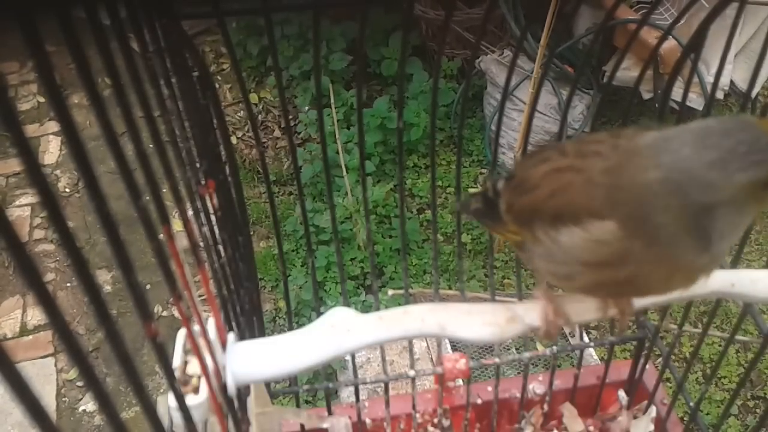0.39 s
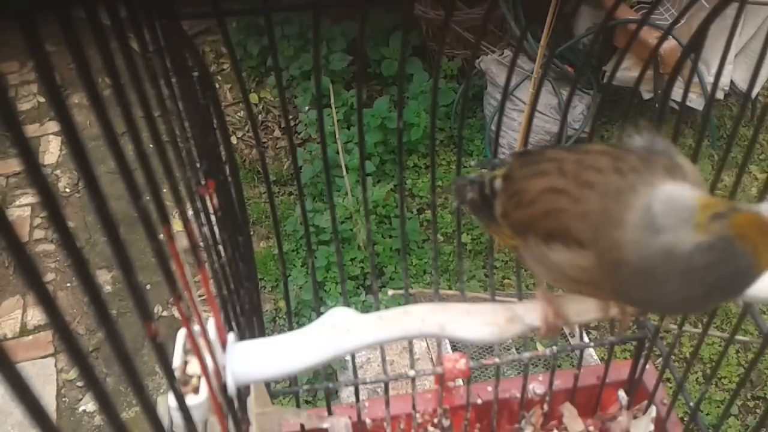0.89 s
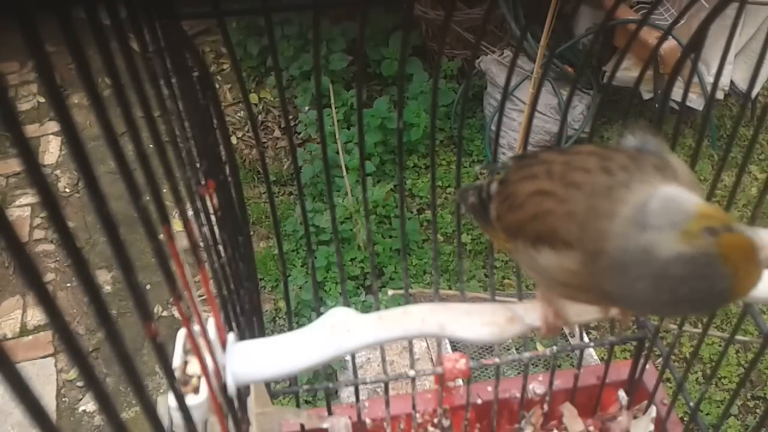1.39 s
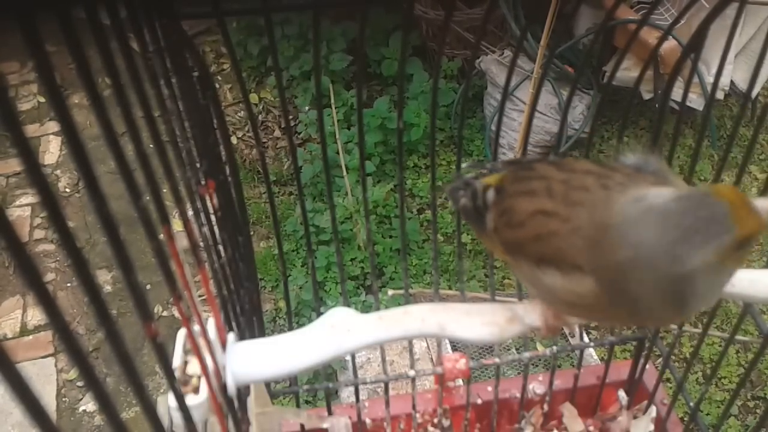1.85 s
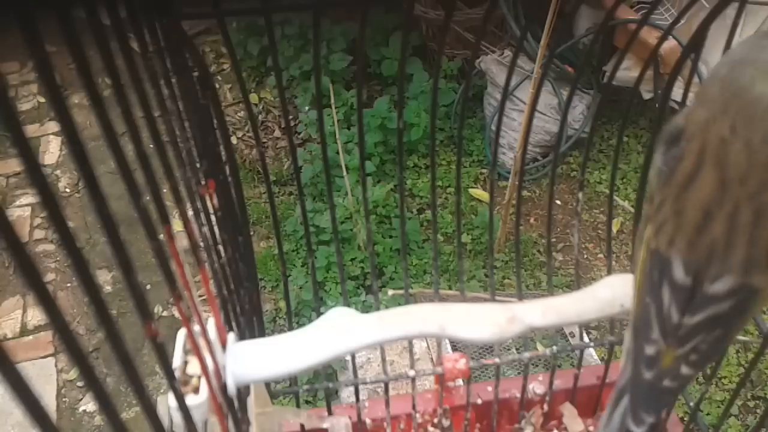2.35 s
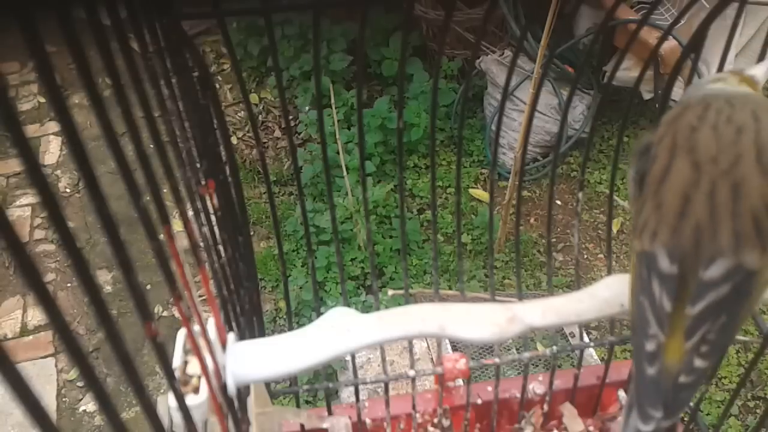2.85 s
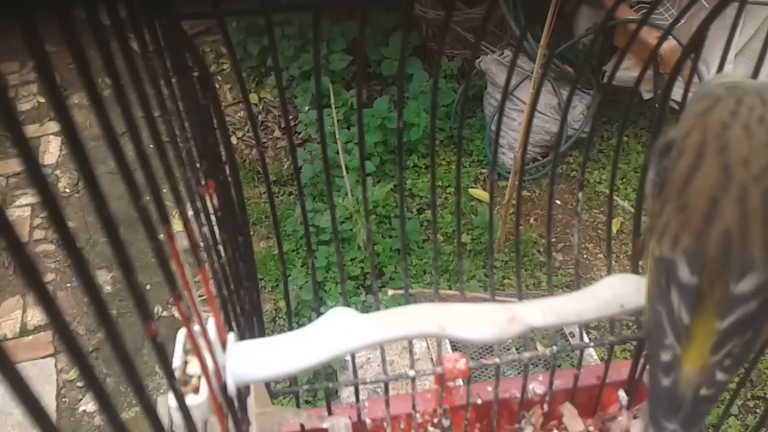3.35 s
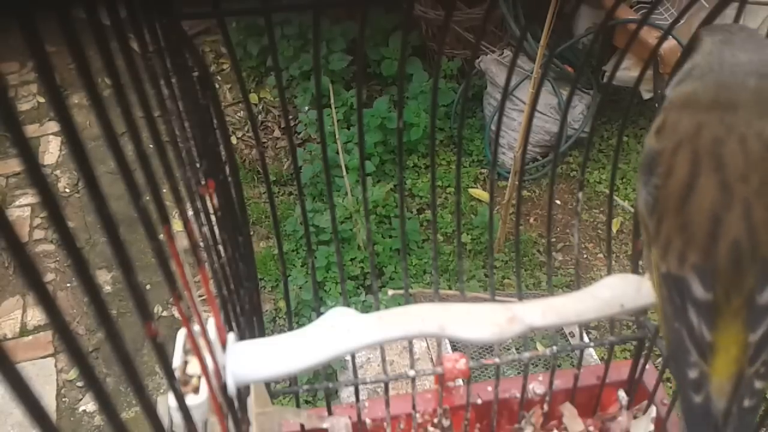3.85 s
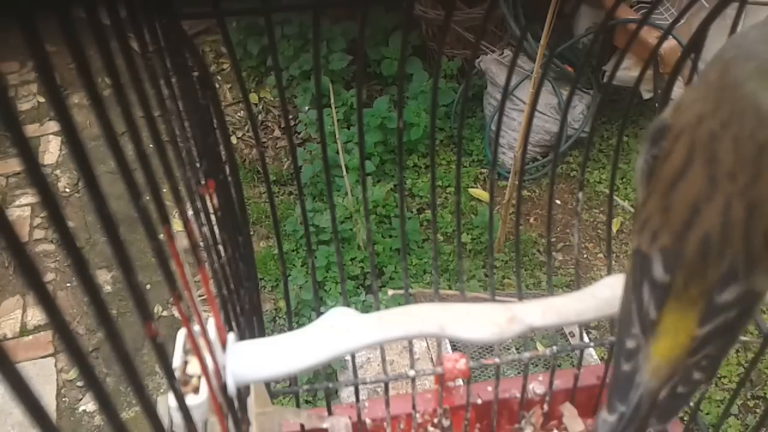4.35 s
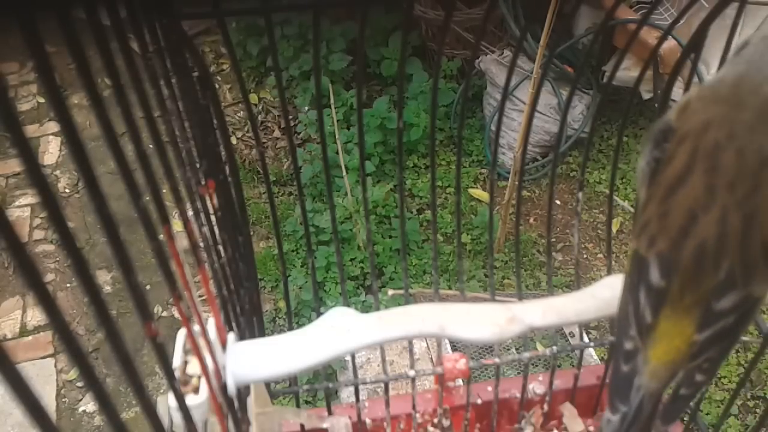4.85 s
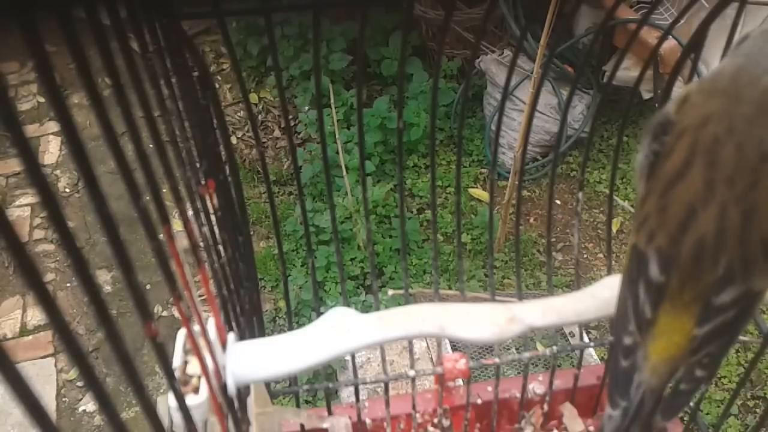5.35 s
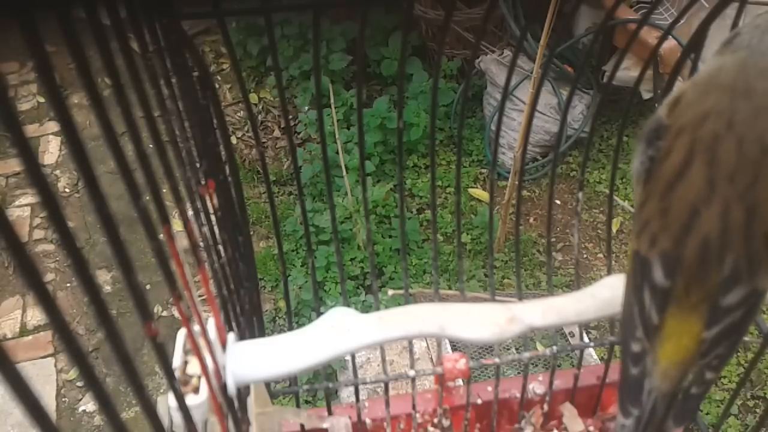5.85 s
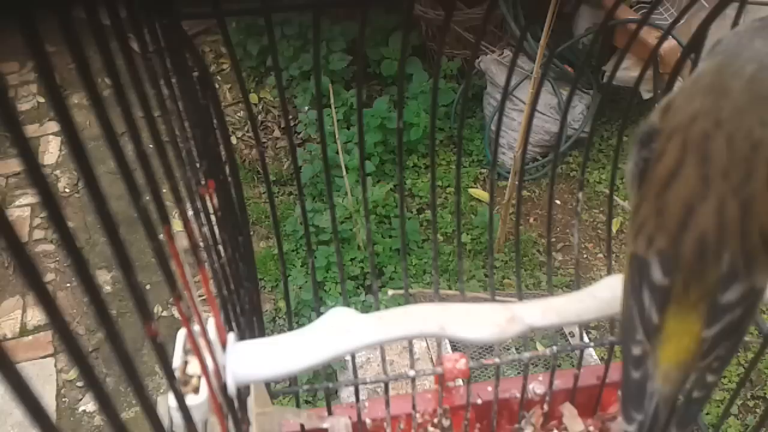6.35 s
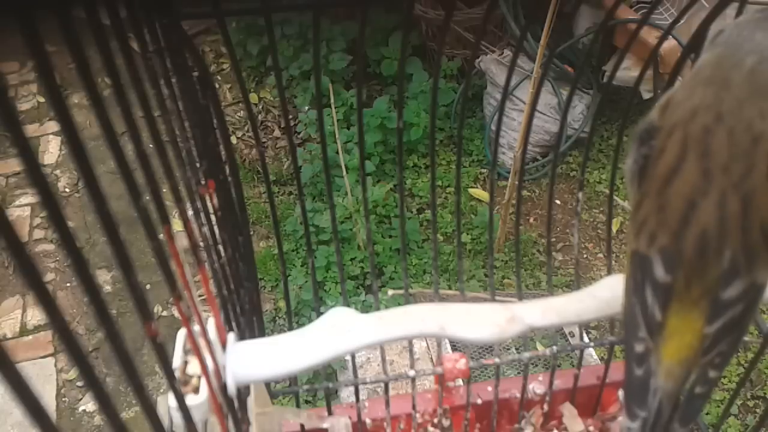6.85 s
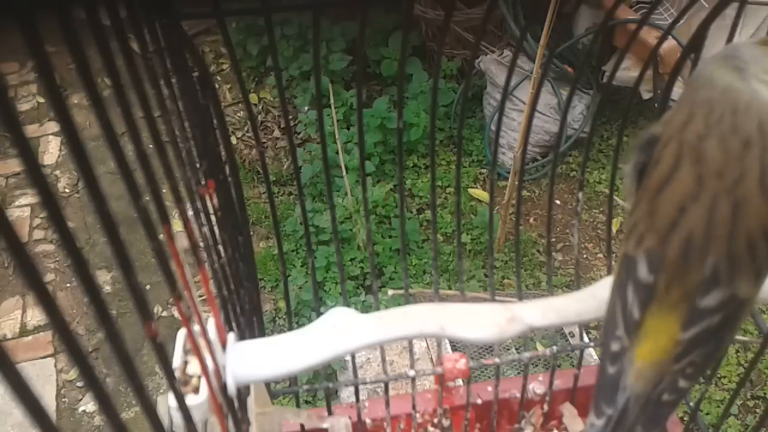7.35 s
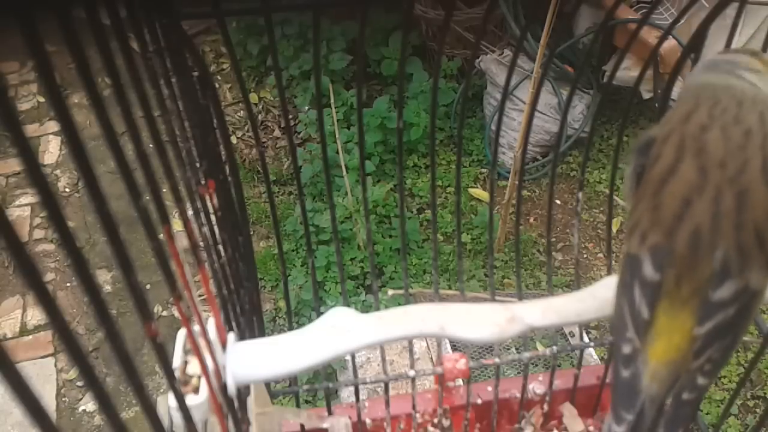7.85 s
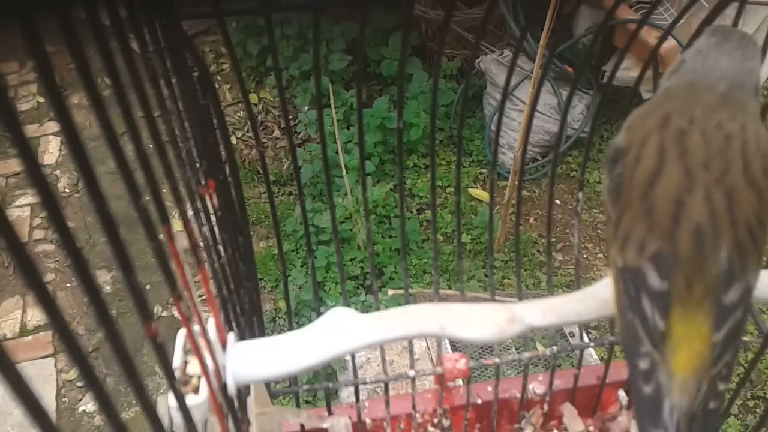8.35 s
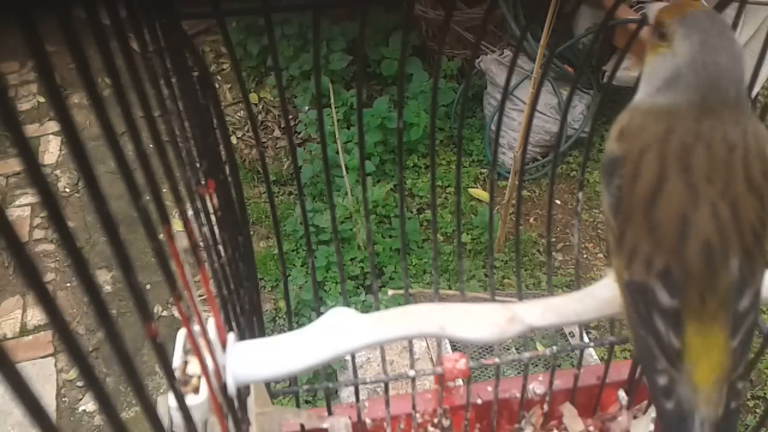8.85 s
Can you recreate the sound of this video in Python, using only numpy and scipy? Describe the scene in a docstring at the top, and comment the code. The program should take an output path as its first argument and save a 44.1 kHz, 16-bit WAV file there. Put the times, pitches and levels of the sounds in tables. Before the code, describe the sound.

A quiet garden with soft, low outdoor rumble and hiss that swells slightly whenever birds call. From 0 to 2 seconds, distant finches give small gliding chirps and faint twitter, ringing briefly between walls; a light feathery brush comes at 0.3. At 2.1 feet and feathers shift with a soft rustle and dull bump, then the near finch gives two quick chips around 2.5. Sparse distant calls continue, a clearer one at 3.35. At 4.4 a thin very high note precedes a loud, bright two-pitched whistle at 4.55, abruptly chopped by a dropout. Distant twitter clusters near 5, then thins out until 7.5. At 7.6 the high note and chord return, repeated louder at 8.05 to 8.3. From 8.4 to past 9 comes a piercing rapid trill: rising, falling and buzzy notes, about four or five rounds per second, slightly overloaded.

```python
"""A garden: a caged finch sings close to a phone, a few loose notes, then a fast three-part trill.
Both sides of its syrinx are near-sine whistles with weak partials, roughened by random flutter.
Other finches, short gliding chirps, call farther off and ring between the walls; feet and feathers brush the perch.
The phone's noise suppressor lets the outdoor hiss, smooth coloured noise, swell whenever a bird sounds.
The loudest notes overload, and stream dropouts abruptly cut the near finch's level."""
import sys
import numpy as np
from scipy import signal
from scipy.fft import rfft, irfft
from scipy.io import wavfile
from scipy.ndimage import uniform_filter1d

SR = 44100
rng = np.random.default_rng(int(sys.argv[2]) if len(sys.argv) > 2 else 0)


def level_to_linear(level):
    """Convert decibel levels to linear amplitude factors, elementwise."""
    exponent = np.asarray(level, float) / 20
    return 10 ** exponent


def unload_audio(sound):
    """Save the sound as a 16-bit wav file, at the path given as the first command line argument."""
    columns = np.transpose(np.atleast_2d(sound))
    # keep every value between -1 and 1, then stretch to whole-number steps
    steps = np.round(np.clip(columns, -1, 1) * 32767)
    wavfile.write(sys.argv[1], SR, steps.astype(np.int16))


N = 407043


def rms_one(x):
    """Scale to rms 1."""
    return x / np.sqrt(np.mean(np.abs(x) ** 2) + 1e-20)


def band(x, low_hz, high_hz):
    """Butterworth band-pass."""
    sos = signal.butter(2, [low_hz, min(high_hz, .45 * SR)], "band", fs=SR, output="sos")
    return signal.sosfilt(sos, x)


def lowpass(x, order, hz):
    """Butterworth low-pass."""
    return signal.sosfilt(signal.butter(order, hz, fs=SR, output="sos"), x)


def add(track, sound, s):
    """Mix a sound in at a time in seconds."""
    at = max(round(s * SR), 0)
    track[at:at + len(sound)] += sound[:N - at]


def echoes(x, t60_s, gap_s):
    """Scattered reflections from walls and ground: clumped noise that dies away, unit energy."""
    t = np.arange(SR) / SR
    clump_db = 4 * np.interp(t, np.arange(201) / 200, rng.standard_normal(201))
    decay = level_to_linear(-60 * t / t60_s)
    tail = rng.standard_normal(SR) * level_to_linear(clump_db) * decay * (t > gap_s)
    return signal.fftconvolve(x, tail / np.linalg.norm(tail))[:N]


def air():
    """Distant traffic, leaves and microphone hiss as smooth coloured noise."""
    # spectrum of the outdoor bed: (frequency [Hz], relative density [dB])
    air_colour = [(15, -36), (25, -16.5), (97, -8.5), (130, -9), (242, -13), (677, -22.5), (796, -21.5),
                  (2350, -30.5), (16000, -40.5)]
    level_db = -55.5      # rms
    points_hz, points_db = np.transpose(air_colour)
    hz = np.maximum(np.fft.rfftfreq(N, 1 / SR), 10)
    colour = level_to_linear(np.interp(np.log(hz), np.log(points_hz), points_db))
    return level_to_linear(level_db) * rms_one(irfft(rfft(rng.standard_normal(N)) * colour, N))


def chatter():
    """Buzzy notes and huddles of overlapping twitter: quick chirps, each sweeping part of the range."""
    # huddles: (start [s], length [s], lowest pitch [Hz], highest pitch [Hz], level before random cuts [dB])
    huddles = [(0.0, 0.15, 3200, 5000, -62.5), (.93, 0.27, 3200, 5200, -64), (1.72, .12, 3550, 4100, -64),
               (2.70, 0.18, 3300, 4400, -62), (2.55, .45, 4500, 5600, -67), (2.94, .03, 3800, 4900, -62),
               (3.17, 0.035, 2520, 6070, -66), (3.34, 0.046, 3500, 5220, -59.5),
               (3.35, .06, 5080, 5700, -41.5), (4.075, .12, 4940, 5500, -65.5),
               (4.695, .06, 2934, 5600, -58), (4.705, 0.07, 5700, 5980, -44.5),
               (4.89, .05, 3900, 5600, -60), (4.935, 0.07, 3900, 5800, -52.5),
               (4.99, .22, 3350, 5030, -56.5), (6.72, 0.33, 3500, 5200, -62),
               (6.849, 0.056, 5250, 5600, -52.5)]
    chirps_per_s, fade_db = 300, 3      # each huddle dies away by the fade
    notes = []
    for s, length, low_hz, high_hz, db in huddles:
        span_hz = high_hz - low_hz
        for when, first, last, cut in rng.random((round(chirps_per_s * length), 4)):
            first_hz, last_hz = low_hz + span_hz * first, low_hz + span_hz * last
            chirp_db = db - 10.0 * cut - fade_db * (when - .5)
            notes.append((s + length * when, .014, first_hz, last_hz, chirp_db))
    return notes


def neighbours():
    """Short glides toward a last pitch, longer ones swelling more, half drowned in their own reflections."""
    # farther calls, and at 4.63 s a held 5.5 kHz note that sounds on where the near finch's note breaks off:
    # (start [s], kind of call, last pitch [Hz], level before swell [dB])
    far_calls = [ (.001, "hold", 5300, -57), (.001, "hold", 3230, -63), (.40, "drop", 7400, -64),
                 (.403, "drop", 6130, -53), (.405, "hook", 3250, -66), (.529, "hold", 5150, -48),
                 (.529, "hold", 4353, -48.5), (.82, "dive", 5800, -58), (.824, "dive", 5070, -55),
                 (1.055, "hold", 4420, -57.5), (1.276, "peep", 3160, -63), (1.391, "whip", 5050, -42),
                 (1.40, "peep", 6700, -62), (1.83, "hold", 5200, -66), (2.007, "climb", 3660, -58),
                 (2.691, "whip", 4220, -60), (2.801, "hold", 3530, -62), (2.91, "blip", 2800, -57),
                 (3.00, "peep", 4300, -57), (3.01, "blip", 2330, -61), (3.17, "blip", 3000, -63),
                 (3.655, "hook", 4180, -50.5), (3.673, "swoop", 3164, -61), (3.73, "slide", 5500, -53),
                 (4.101, "drop", 4040, -60), (4.63, "hold", 5500, -59), (4.86, "slide", 3770, -53.5),
                 (4.969, "slide", 3568, -55), (5.027, "peep", 7180, -63.5), (5.057, "hold", 5140, -61),
                 (5.11, "blip", 4380, -48), (5.135, "dive", 3760, -54), (5.633, "slide", 3760, -57),
                 (5.696, "peep", 4020, -47), (5.965, "blip", 2900, -59), (6.066, "whip", 3800, -54),
                 (6.279, "hold", 5750, -58.5), (6.28, "drop", 6700, -60.5), (6.396, "peep", 6220, -63),
                 (6.40, "hold", 4850, -63), (6.70, "slide", 3870, -55), (6.77, "peep", 3980, -48),
                 (7.156, "hold", 6050, -68), (7.654, "hook", 3830, -50), (7.69, "swoop", 3000, -61.5),
                 (7.71, "hook", 5000, -58.5), (8.077, "hold", 3950, -59.5)]
    # shape by kind of call: (length [s], first pitch over last pitch [ratio])
    far_kinds = {"swoop": (.2, .58), "climb": (.13, .73), "whip": (.048, .67), "hook": (.075, .78),
                 "slide": (.09, .87), "peep": (.045, .94), "blip": (.025, .9), "hold": (.055, .99),
                 "drop": (.055, 1.05), "dive": (.035, 1.15)}
    echo_db, echo_t60_s = 1, .55
    waver_depth, waver_rate_hz = .006, 120      # rms share of the pitch; top of the waver's band
    notes = []
    for s, kind, last_hz, db in far_calls:
        length, ratio = far_kinds[kind]
        notes.append((s, length, ratio * last_hz, last_hz, db))
    notes += chatter()
    waver = rms_one(lowpass(rng.standard_normal(N), 2, waver_rate_hz))
    falter = rms_one(band(rng.standard_normal(N), 15, 60))
    calls = np.zeros(N)
    for s, length, first_hz, last_hz, db in notes:
        u = np.linspace(0, 1, round(length * SR))
        at = round(s * SR)
        # calls glide fastest at first, short ones most; chatter chirps run straight
        bend = 1.1 + .07 / length if length > .02 else 1
        hz = last_hz + (first_hz - last_hz) * (1 - u) ** bend
        hz = hz * (1 + waver_depth * waver[at:][:len(u)])
        phase = 2 * np.pi * np.cumsum(hz) / SR
        edges = np.clip(np.minimum(u * length / 0.0057, (1 - u) * length / 0.0069), 0, 1)
        # long notes grow, unevenly
        swell = level_to_linear(-65 * length * (0.5 - u) + 3.0 * falter[at:][:len(u)])
        tone = np.sin(phase) + level_to_linear(-34) * np.sin(2 * phase)
        add(calls, level_to_linear(db) * edges * swell * tone, s)
    return calls + level_to_linear(echo_db) * echoes(calls, echo_t60_s, gap_s=0.0037)


def shuffles():
    """Feet and feathers shift: a sudden brush of hiss over a dull push through the perch."""
    # perch noises: (start [s], rough length [s], starting hiss rms [dB], starting thump rms [dB])
    perch_moves = [(0.291, 0.09, -59, -75), (2.139, 0.11, -54, -51.5)]
    hiss = rms_one(band(rng.standard_normal(N), 1700, 15000))
    thump = rms_one(band(rng.standard_normal(N), 140, 590))
    out = np.zeros(N)
    for s, length, hiss_db, thump_db in perch_moves:
        now = slice(round(s * SR), round((s + 2 * length) * SR))
        fade = np.exp(-(np.linspace(0, 2, now.stop - now.start) / 0.68) ** 3)
        out[now] += fade * (level_to_linear(hiss_db) * hiss[now] + level_to_linear(thump_db) * thump[now])
    return out


def song():
    """Loose notes, then the rounds of the trill: (s, syllable, upper dB, lower dB, pitch ratio)."""
    # loose notes: (start [s], syllable, upper side peak [dB], lower side peak [dB], pitch [ratio])
    loose_notes = [(2.449, "chip", -27, None, 1.001), (2.515, "whit", -25.5, -24, 1.001),
                   (4.413, "tsip", -19, None, 1.001), (4.556, "chord", -11, -10.1, 1.002),
                   (7.624, "tsip", -21.5, None, .998), (7.779, "chord", -11, -13, 1.001),
                   (8.052, "tsip", -13, None, .977), (8.184, "chord", -6, -8, .986),
                   (8.310, "flick", None, -15.5, 1.001)]
    # rounds of the trill: (start [s], holding back [dB], pitch [ratio])
    trill_rounds = [(8.411, -11, .997), (8.629, -.7, 1.001), (8.850, -.4, 1.001), (9.071, 0.3, .995)]
    # one round: (syllable, time into the round before slowing [s], (upper, lower) peak before holding back [dB],
    # (upper, lower) share of the holding back [ratio])
    round_parts = [("rise", 0, (-4.5, -3), (.45, .85)), ("fall", .095, (-5.5, -9), (.35, .5)),
                   ("churr", .136, (0, -2.5), (0, .2))]
    slowing = .012      # each round is drawn out by this share more
    notes = list(loose_notes)
    for k, (s, shy_db, ratio) in enumerate(trill_rounds):
        for name, late, peaks_db, shares in round_parts:
            upper_db, lower_db = (peak + share * shy_db for peak, share in zip(peaks_db, shares))
            notes.append((s + late * (1 + slowing * k), name, upper_db, lower_db, ratio))
    return notes


def whistle(glide, breath):
    """One side's note: pitch eases to its goal and drifts; level swells, holds, sinks, shuts; tail roughens."""
    attack_ease = 1.4      # the swell is this much rounder than the glide
    release_db, release_share = 20.5, .14      # final drop, over this share of the note's length
    onset_rough, roughen_s = .05, .022      # roughness 0-1 up to the peak, then time to reach the tail's
    _, first_hz, goal_hz, glide_s, drift, ease = glide
    length, attack, depth_db, hold, sink_db, sink_s, tail = breath
    t = np.arange(round(length * SR)) / SR
    hz = goal_hz + (first_hz - goal_hz) * np.clip(1 - t / glide_s, 0, 1) ** ease
    hz = hz + drift * np.maximum(t - glide_s, 0)
    db = -depth_db * np.clip(1 - t / attack, 0, 1) ** (attack_ease * ease)
    db = db - sink_db * (1 - np.exp(-np.maximum(t - attack - hold, 0) / sink_s))
    db = db - release_db * np.clip(1 - (1 - t / length) / release_share, 0, 1)
    onset = min(onset_rough, tail)
    rough = onset + (tail - onset) * np.clip((t - attack) / roughen_s, 0, 1)
    return hz, db, np.clip(rough, 0, 1)


def syrinx_side(side, rush):
    """One side's whistle with weak partials; roughness swaps the steady tone for an unsteady flutter."""
    # each syllable's glide, upper then lower side: (delay [s], first pitch [Hz], goal pitch [Hz],
    # glide time [s], drift after it [Hz/s], ease [exponent: 1 straight, more = rounder]), before the pitch ratio
    glides = {"chip": [(0, 2000, 2980, .021, -2000, 1.35), None],
              "whit": [(.008, 3370, 4050, .014, 11000, 1.5), (0, 2850, 3610, .019, 100, 1.4)],
              "tsip": [(0, 6150, 6360, .021, -3400, 1.6), None], "chord": [(0, 5170, 5250, .016, 500, 1.2),
              (.002, 4380, 4530, .016, -1700, 1.3)], "flick": [None, (.003, 1700, 3950, .009, -300, 1.3)],
              "rise": [(.017, 4700, 5240, .018, -1800, 1.2), (.003, 2650, 4640, .042, -4000, .85)],
              "fall": [(0, 7050, 6490, .022, 2500, 1.05), (.004, 5870, 5520, .022, 100, 1.01)],
              "churr": [None, (0, 2600, 3975, .0155, -1500, 1.3)]}
    # each syllable's breath, upper then lower side: (length [s], attack [s], attack depth [dB], hold [s],
    # sinks by [dB], sink time constant [s], roughness of the tail [0-1])
    breaths = {"chip": [(.031, .016, 31, .005, 8, .011, .005), None],
               "whit": [(.029, .008, 21, .002, 22, .018, .05), (.036, .019, 26, .004, 18, .012, .08)],
               "tsip": [(.066, .021, 43, .004, 14, .022, .008), None],
               "chord": [(.088, .021, 33, .021, 19, .008, .025), (.086, .018, 32, .006, 9.5, .005, .025)],
               "flick": [None, (.026, .006, 24, .001, 14, .008, .6)],
               "rise": [(.067, .017, 36, .006, 14, .035, .2), (.088, .031, 40, .013, 21, .014, .9)],
               "fall": [(.044, .021, 38, .002, 6, .004, .4), (.027, .013, 24, .012, 1.5, .005, .06)],
               "churr": [None, (.060, .014, 28, .002, 13, .012, .8)]}
    # second partial by pitch, low notes are richer: (pitch [Hz], level relative to the note [dB])
    overtone = [(2300, -1.5), (2950, -14.5), (3700, -31.5), (4500, -34), (6300, -27)]
    # syllables whose second partial is weaker or stronger than usual: (syllable, change [dB])
    richness_db = {"flick": -14, "churr": 2.1}
    third_db, rough_hz = -10.5, 300      # factor on (second partial)^1.5; top of the flutter's band
    hz, size, rough, rich_db = np.full(N, 4000.), np.zeros(N), np.zeros(N), np.zeros(N)
    for s, name, *levels_db, ratio in song():
        glide = glides[name][side]
        if glide:
            at = round((s + glide[0]) * SR)
            pitch, db, unsteady = (v[:N - at] for v in whistle(glide, breaths[name][side]))
            now = slice(at, at + len(db))
            hz[now] = ratio * pitch
            size[now] = level_to_linear(levels_db[side] + db)
            rough[now] = unsteady
            rich_db[now] = richness_db.get(name, 0)
    hz = uniform_filter1d(hz, size=45)      # the syrinx muscles round the corners of a glide
    size = np.abs(uniform_filter1d(size, size=45))
    turn = np.exp(2j * np.pi * np.cumsum(hz) / SR)
    flutter = lowpass(rng.standard_normal((2, N)), 4, rough_hz)
    sway = np.sqrt(1 - rough) + np.sqrt(rough) * rms_one(flutter[0] + 1j * flutter[1])
    tone = sway * turn
    points_hz, points_db = np.transpose(overtone)
    second = level_to_linear(rich_db + np.interp(np.log(hz), np.log(points_hz), points_db))
    third = level_to_linear(third_db) * second ** 1.5
    sound = (size * (tone + second * tone ** 2 + third * tone ** 3)).real
    sound += level_to_linear(-38) * size * np.sqrt(rough) * rush      # rough notes leak air past the membrane
    return sound, np.sqrt(size) * tone


def finch():
    """Two syrinx sides whistle at once; coupled, they add a sum tone and sidebands, and a near echo follows."""
    # stream dropouts: the near finch and its echo abruptly lose level: (from [s], to [s], gain [dB])
    dropouts = [(4.5783, 4.5884, -11), (4.6292, 4.69, -30)]
    sum_tone_db, sideband_db = -28.5, -28.5
    echo_db, echo_t60_s = -22, 0.36
    rush = rms_one(band(rng.standard_normal(N), 7000, 16000))
    upper_sound, upper = syrinx_side(0, rush)
    lower_sound, lower = syrinx_side(1, rush)
    out = upper_sound + lower_sound
    upper_swing, lower_swing = (side / (np.abs(side) + 1e-9) for side in (upper, lower))
    beat = upper * lower.conj()      # turns at the difference of the two pitches
    out += level_to_linear(sum_tone_db) * (upper * lower).real
    # one sideband above and one below the pair
    out += level_to_linear(sideband_db) * (beat * upper_swing + beat.conj() * lower_swing).real
    out = out + level_to_linear(echo_db) * echoes(out, echo_t60_s, gap_s=0.0024)
    for start, end, db in dropouts:
        out[round(start * SR):round(end * SR)] *= level_to_linear(db)
    return out


def scene():
    """The garden, the farther birds and the near finch on its perch."""
    return (air() + neighbours() + shuffles() + finch())[None]


def suppressor(x):
    """Turns the sound down until the bird band grows loud, then closes again slowly; bass gain stays fixed."""
    opens_db, span_db = -55.5, 2.5      # bird-band level and softness of the opening
    fall_db_s, from_hz = 29, 300      # closing speed; the bass is split off below this
    level_db = 10 * np.log10(np.abs(uniform_filter1d(band(x, 2300, 11000) ** 2, size=1300)) + 1e-12)
    openness = np.exp(np.clip((level_db - opens_db) / span_db, -30, 30))
    wanted_db = -12 / (1.5 + openness)      # -8 dB when fully closed
    # opening follows the birds, closing is no faster than the fall
    fall = fall_db_s * np.arange(N) / SR
    gain_db = uniform_filter1d(np.maximum.accumulate(wanted_db + fall) - fall, size=900)
    low = lowpass(x, 1, from_hz)
    return low * level_to_linear(-8.5) + (x - low) * level_to_linear(gain_db)


def overload(x):
    """A firm-kneed ceiling bends the loudest peaks; its by-products are thin in the bass."""
    top, knee = 0.68, 6.6      # full-scale amplitude; higher = harder knee
    clipped = x / (1 + np.abs(x / top) ** knee) ** (1 / knee)
    sos = signal.butter(2, 1300, fs=SR, output="sos")
    return clipped - .7 * signal.sosfiltfilt(sos, clipped - x, padtype=None)


def band_limit(x):
    """A steep low-pass at the top of the band."""
    return signal.sosfilt(signal.butter(12, 16150, fs=SR, output="sos"), x)


def record(dry):
    """The phone: noise suppressor, then overload."""
    mix = overload(suppressor(dry[0]))
    return band_limit(mix[None])


dry = scene()
out = record(dry)
unload_audio(out)
```